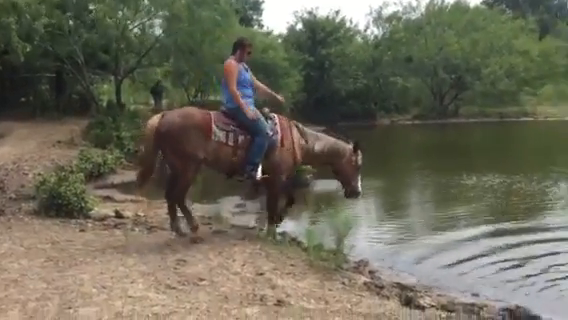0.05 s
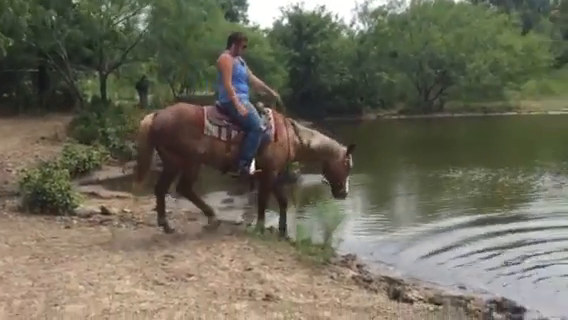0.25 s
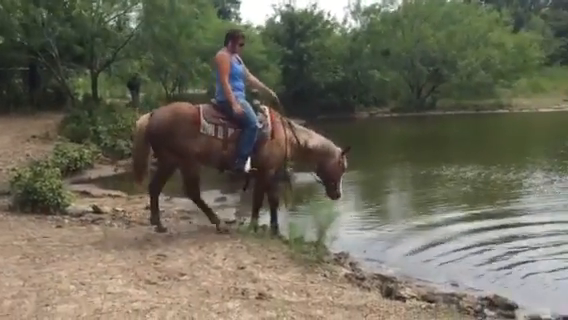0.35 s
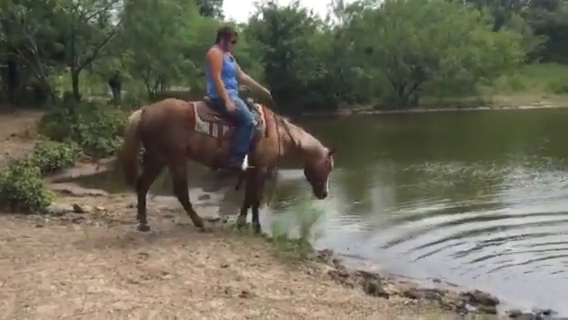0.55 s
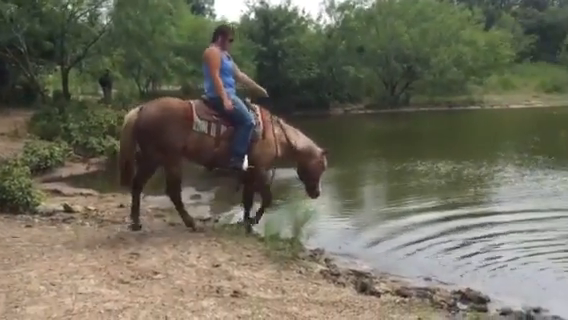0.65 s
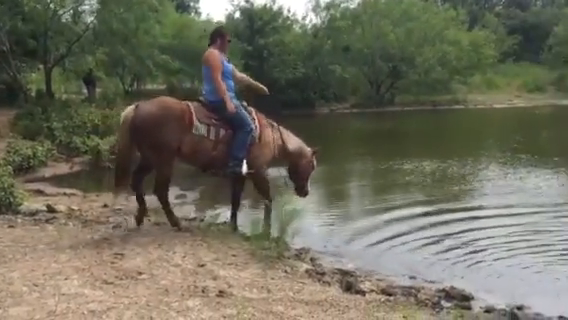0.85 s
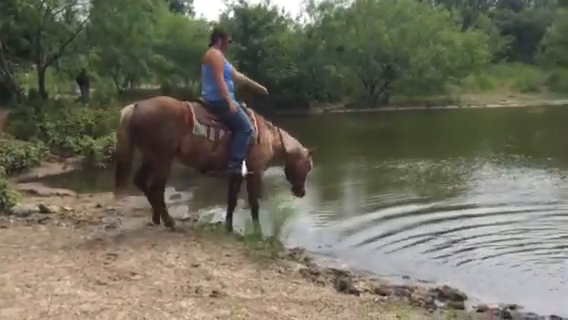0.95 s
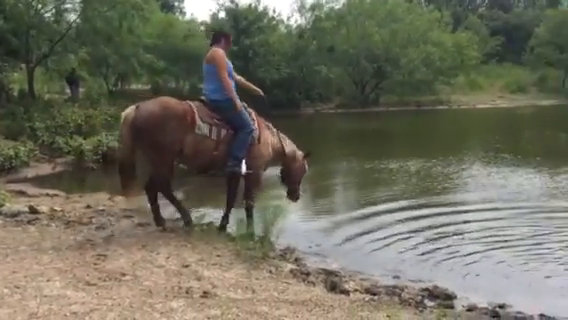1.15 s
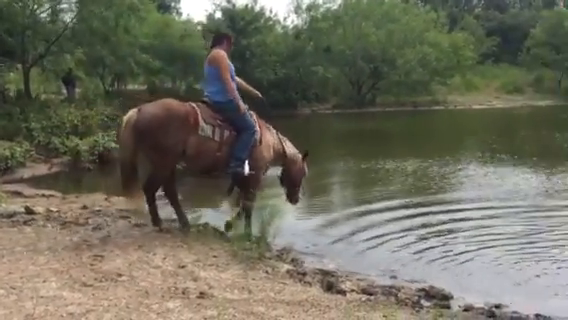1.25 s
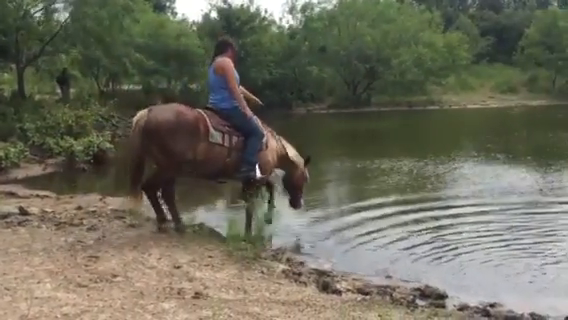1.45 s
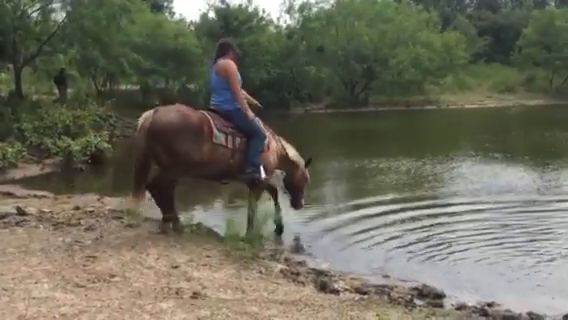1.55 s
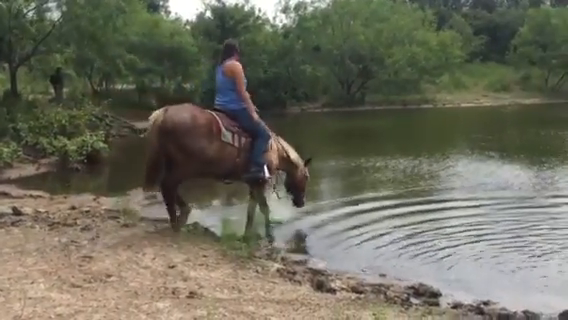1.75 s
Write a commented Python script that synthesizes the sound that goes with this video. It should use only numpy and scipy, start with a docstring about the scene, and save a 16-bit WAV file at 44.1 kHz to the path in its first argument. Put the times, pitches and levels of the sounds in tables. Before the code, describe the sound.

Light wind rumbles on the microphone throughout over faint open-air hiss, with one strong low buffet at about 0.3 seconds. A horse's hooves shuffle very faintly on sand at the start. At 1 second a hoof lightly slaps shallow pond water. A faint, short, distant hoot follows near 1.4 seconds, and at 1.7 seconds another hoof makes a small splash with plinking drops.

```python
"""Light wind rumbles on the microphone and buffets it, once strongly, over faint open-air hiss.
At the edge of a pond on a quiet day, a horse shuffles its hind hooves on the sandy bank.
One forehoof slaps the shallows and sets air pockets ringing; the other splashes in and throws
drops. Two tiny ticks and a short far hoot sit behind; the shore faintly scatters water and hoot."""
import sys
import numpy as np
from scipy import signal
from scipy.fft import rfft, irfft
from scipy.io import wavfile
from scipy.ndimage import uniform_filter1d

SR = 44100
rng = np.random.default_rng(int(sys.argv[2]) if len(sys.argv) > 2 else 0)


def master_out(mix):
    """Clip the mix to full scale and print it as 16-bit PCM to the path in sys.argv[1]."""
    frames = np.transpose(np.atleast_2d(mix))
    ceiling = np.clip(frames, -1, 1)
    pcm = np.round(ceiling * 32767).astype(np.int16)
    wavfile.write(sys.argv[1], SR, pcm)


N = 79380
T = np.arange(N) / SR


def from_db(db):
    """Decibels to gain."""
    return 10 ** (np.asarray(db) / 20)


def rms_one(x):
    """Scale to rms 1."""
    return x / np.sqrt(np.mean(x ** 2) + 1e-20)


def colour(x, spectrum):
    """Give a steady signal a spectrum that falls away past both ends, at rms 1."""
    hz, db = np.transpose(spectrum)
    f = np.arange(N // 2 + 1) * SR / N + 1e-3
    gain = from_db(np.interp(np.log(f), np.log(hz), db))
    roll_off = (np.minimum(f / hz[0], 1) * np.minimum(hz[-1] / f, 1)) ** 2
    return rms_one(irfft(rfft(x) * roll_off * gain, N))


def envelope(start, rise, t60, hold=0):
    """Linear rise, hold, then a decay of 60 dB per t60; all in seconds."""
    age = T - start
    return np.clip(age / rise, 0, 1) * np.exp(-np.log(1000) * np.maximum(age - rise - hold, 0) / t60)


def crackle(bursts, spectrum, grains_per_s=6000, spread_db=1, noise_gain=0.74):
    """Dense grains over fine noise, in bursts that add in power where they overlap."""
    sizes = from_db(spread_db * np.minimum(rng.exponential(1, N), 4))
    signs = rng.choice([-1, 1], N)
    grains = rms_one(sizes * signs * (rng.random(N) < grains_per_s / SR))
    texture = colour(grains + noise_gain * rng.standard_normal(N), spectrum)
    power = sum((from_db(db) * envelope(s, rise, t60)) ** 2 for s, db, rise, t60 in bursts)
    return texture * np.sqrt(power)


def air():
    """Smooth hiss of the open air and far trees."""
    # Each row: frequency in Hz, relative level in dB.
    spectrum = [(200, 4.5), (400, -2.5), (680, 1), (950, -5), (2300, -4.5), (3300, -10), (5200, -11),
                (7000, -17), (9300, -16.5), (10400, -21), (11500, -17.5), (15000, -17)]
    return colour(rng.standard_normal(N), spectrum) * from_db(-66.5)


def far_hoot(start=1.35):
    """A distant note, perhaps a water bird, flutters as its two close partials beat."""
    # Each row: pitch in Hz, peak level in dB.
    partials = [(762, -52.5), (708, -57)]
    tone = sum(from_db(db) * np.sin(2 * np.pi * hz * (T - start)) for hz, db in partials)
    return tone * envelope(start, rise=0.016, t60=0.087, hold=0.024)


def ticks(hz=7400, length_s=0.00138):
    """Two faint high ticks, each a smooth swell of about ten cycles."""
    # Each row: start in seconds, peak level in dB.
    events = [(0.225, -49.5), (1.2284, -48.5)]
    out = np.zeros(N)
    for start, db in events:
        age = T - start
        window = np.sin(np.pi * np.clip(age / length_s, 0, 1)) ** 2
        out += from_db(db) * window * np.cos(2 * np.pi * hz * (age - length_s / 2))
    return out


def shore_scatter(sound):
    """The bank and bushes send back a faint, quickly dying tail."""
    tail = rng.standard_normal(N) * envelope(0, rise=0.0037, t60=0.17)
    tail /= np.sqrt(np.sum(tail ** 2))
    return from_db(-13.5) * signal.fftconvolve(sound, tail)[:N]


def sand_shuffles():
    """The hind hooves shift softly on the sandy bank."""
    # Each row: start in seconds, level in dB, rise and t60 in seconds.
    shuffles = [(-.02, -70.5, 0.04, 1), (.125, -68, 0.015, .35), (.205, -67.5, 0.024, 0.42)]
    # Each row: frequency in Hz, relative level in dB.
    spectrum = [(500, -13), (1200, 1), (2400, 3.5), (3400, -4.5), (4600, -1), (7000, -11.5), (14000, -20)]
    return crackle(shuffles, spectrum)


def wind_rumble():
    """Low turbulence on the microphone follows the breeze."""
    # Each row: time in seconds, level in dB.
    breeze = [(0, -45.5), (.05, -44.5), (.115, -50), (.17, -42.5), (.2, -45), (.26, -36), (.36, -46.5),
              (.55, -44), (.6, -39), (.71, -49.5), (.8, -45), (.94, -49.5), (1.04, -43), (1.11, -49.5),
              (1.22, -48), (1.33, -41.5), (1.45, -45.5), (1.62, -52.5), (1.78, -45)]
    # Each row: frequency in Hz, relative level in dB.
    spectrum = [(20, -34), (35, -20), (55, -2.5), (78, 2.5), (115, -9), (165, -15), (220, -24.5),
                (300, -50.5), (450, -47)]
    noise = colour(rng.standard_normal(N), spectrum)
    noise /= np.sqrt(uniform_filter1d(noise ** 2, size=2600) + 1e-9)  # even out its own swells
    return noise * from_db(np.interp(T, *np.transpose(breeze)))


def wind_buffets(sag_cycles=1.65):
    """Eddies hit the microphone as pressure swings that slow as they die; the strongest flutter."""
    # Each row: peak time in seconds, peak level in dB, pitch there in Hz, width in cycles.
    eddies = [(.2040, -30.5, 72.3, 0.64), (0.2801, -36.5, 390, 0.63), (.2870, -20, 110, 0.59),
              (0.3072, -13, 93.5, 0.65), (.9900, -35.5, 79, 0.74), (1.4830, -34, 79, 0.65)]
    # Each row: start in seconds, level in dB, rise and t60 in seconds.
    flutter = [(.273, -58.5, 0.0029, 0.04), (.2885, -43.5, 0.0026, .07)]
    # Each row: frequency in Hz, relative level in dB.
    flutter_spectrum = [(250, 3), (400, -1.5), (560, 2), (750, -14), (1300, -24), (2700, -22), (3600, -38),
                        (9000, -62)]
    swings = np.zeros(N)
    for peak, db, hz, width in eddies:
        period_stretch = np.maximum(1 + (T - peak) * hz / sag_cycles, 1e-6)
        cycles = sag_cycles * np.log(period_stretch)  # pitch sags by a factor e every sag_cycles
        swings += from_db(db) * np.exp(-.5 * (cycles / width) ** 2) * np.cos(2 * np.pi * cycles)
    return swings + crackle(flutter, flutter_spectrum)


def drops(pitch_rise_per_s=3.2):
    """Single drops and bubbles ring briefly on the pond, rising in pitch."""
    # Each row: start in seconds, peak level in dB, starting pitch in Hz, t60 in seconds.
    plinks = [(1.1235, -56.5, 560, 0.063), (1.6940, -55, 6100, .004), (1.7020, -56, 4570, .006),
              (1.7168, -34.5, 3300, 0.0017), (1.7194, -48, 1356, 0.04), (1.7241, -46, 1940, 0.0035),
              (1.7477, -58, 1250, 0.041), (1.7644, -49, 1400, 0.028), (1.7698, -50.5, 2660, 0.033),
              (1.7723, -50.5, 2030, 0.026), (1.7935, -54, 2570, 0.064), (1.7975, -54, 1400, 0.025)]
    out = np.zeros(N)
    for start, db, hz, t60 in plinks:
        age = np.maximum(T - start, 0)
        cycles = hz * age * (1 + pitch_rise_per_s * age / 2)
        out += from_db(db) * envelope(start, .5 / hz, t60) * np.sin(2 * np.pi * cycles)
    return out


def hoof_slap(pocket_db=-44.5):
    """The first forehoof smacks the shallows; as it lands fully, trapped air pockets ring."""
    # Each row: start in seconds, level in dB, rise and t60 in seconds.
    slaps = [(.980, -59.5, 0.0061, 0.25), (1.0000, -44, 0.0045, 0.038), (1.0070, -44.5, 0.0041, 0.024)]
    # Each row: frequency in Hz, relative level in dB.
    spectrum = [(200, -4.5), (380, -5), (800, 0), (1250, 3.5), (1900, -7.5), (2300, -3), (3000, -5),
                (3400, -11), (4200, -7.5), (5600, -14.5), (6600, -27), (9000, -29.5), (14000, -33)]
    # Each row: pitch in Hz, level in dB relative to pocket_db, t60 in seconds.
    pockets = [(675, -5, 0.041), (1051, -2, .03), (1182, 1, 0.031), (1360, -19, .028), (1650, 1.5, 0.021),
               (2190, 2.5, 0.024), (4190, -6.5, 0.018)]
    landing, _, rise, _ = slaps[-1]
    rings = np.zeros(N)
    for hz, db, t60 in pockets:
        tone = np.sin(2 * np.pi * (hz * T + rng.random()))
        rings += from_db(pocket_db + db) * envelope(landing, rise, t60) * tone
    return crackle(slaps, spectrum) + rings


def hoof_splash():
    """The second forehoof splashes in, and the thrown water falls back."""
    # Each row: start in seconds, level in dB, rise and t60 in seconds.
    splashes = [(1.688, -63.5, 0.027, 0.24), (1.7150, -56, 0.0045, 0.26), (1.7190, -48, 0.0057, 0.033),
                (1.7670, -62.5, .004, 0.11), (1.7860, -64, 0.0037, .1)]
    # Each row: frequency in Hz, relative level in dB.
    spectrum = [(600, -32), (950, -37), (1300, 9), (2000, 3), (3000, 4), (5400, -0.5), (7800, -15.5),
                (14000, -25)]
    return crackle(splashes, spectrum)


def scene():
    """One microphone in the breeze takes in the pond and its shore."""
    pond = hoof_slap() + hoof_splash() + drops() + far_hoot()
    shore = shore_scatter(pond) + sand_shuffles()
    return (pond + shore + ticks() + wind_rumble() + wind_buffets() + air())[None]


def record(dry, cutoff_hz=15350):
    """A steep low-pass cuts the highest treble."""
    return signal.sosfilt(signal.ellip(12, .1, 80, cutoff_hz, fs=SR, output="sos"), dry)


dry = scene()
out = record(dry)
master_out(out)
```